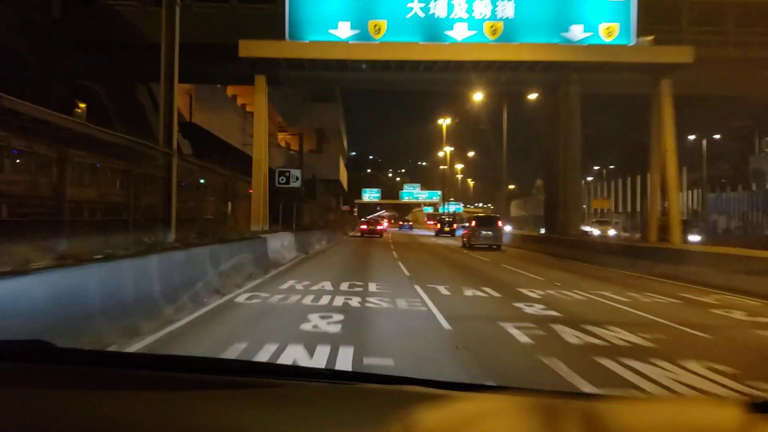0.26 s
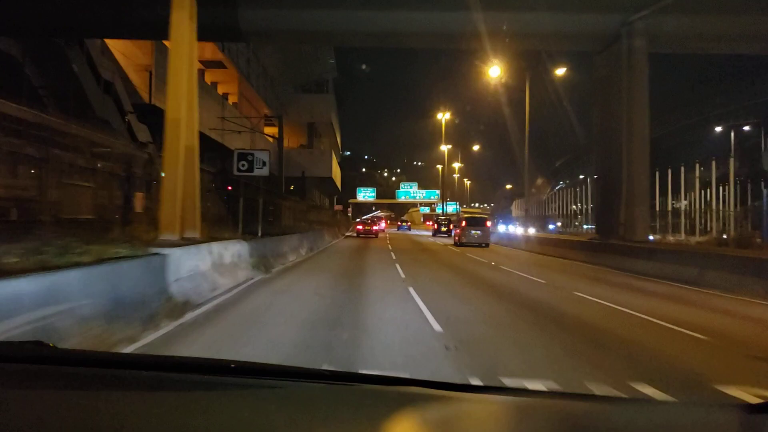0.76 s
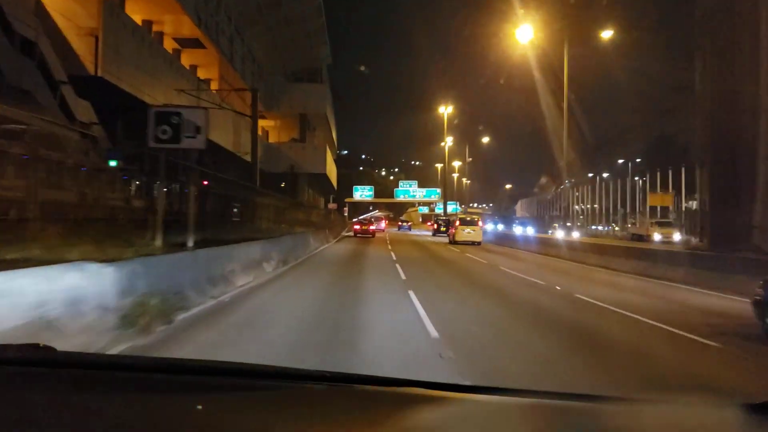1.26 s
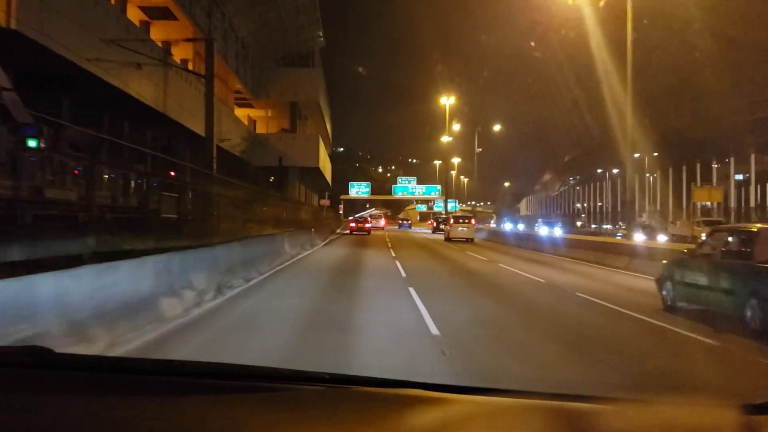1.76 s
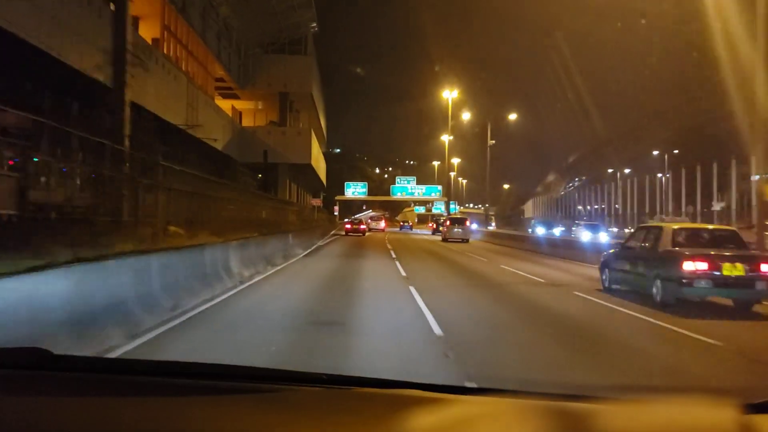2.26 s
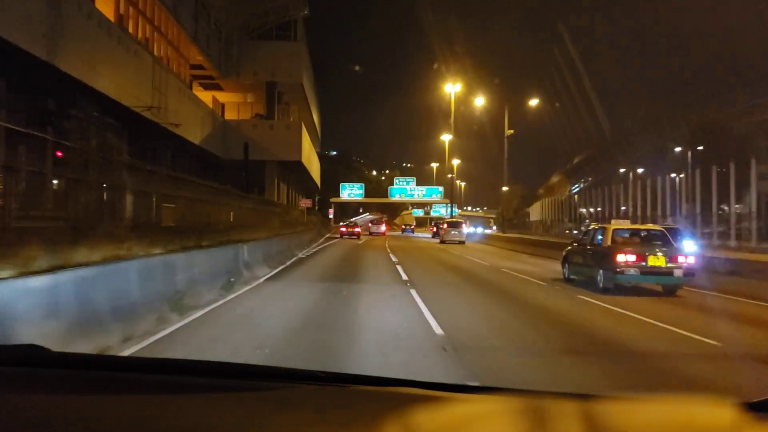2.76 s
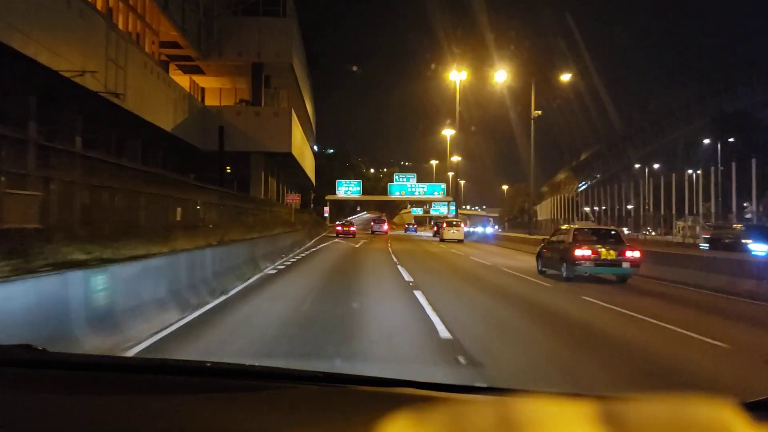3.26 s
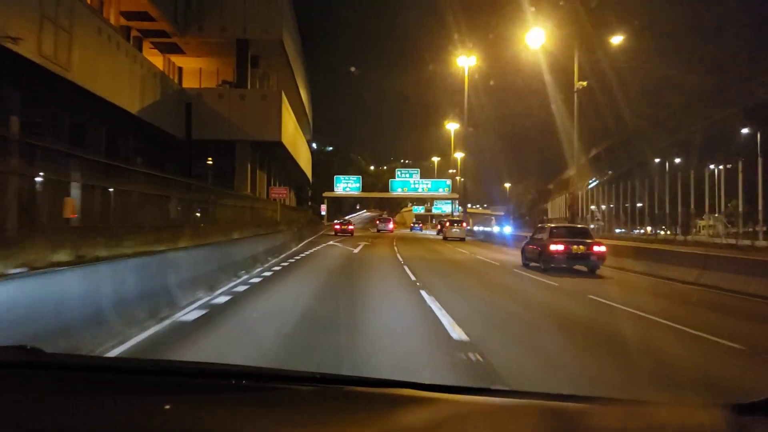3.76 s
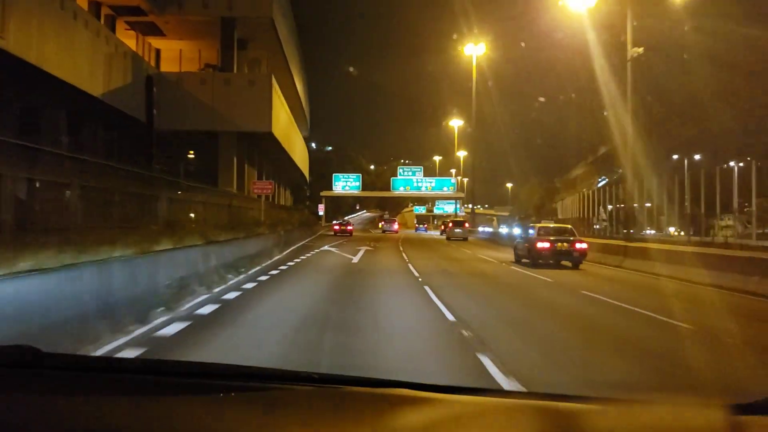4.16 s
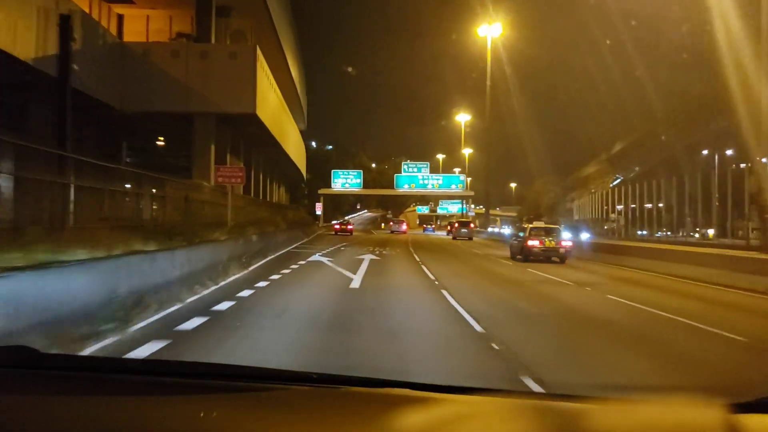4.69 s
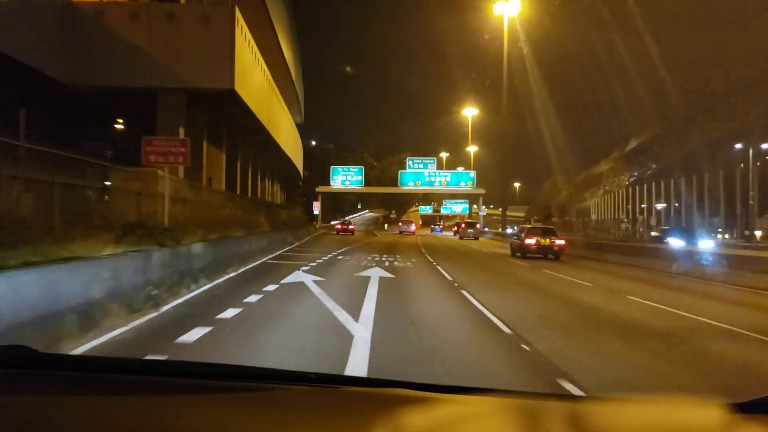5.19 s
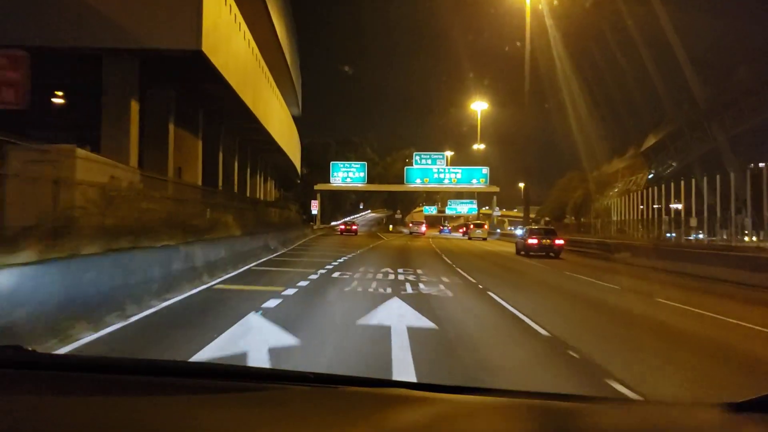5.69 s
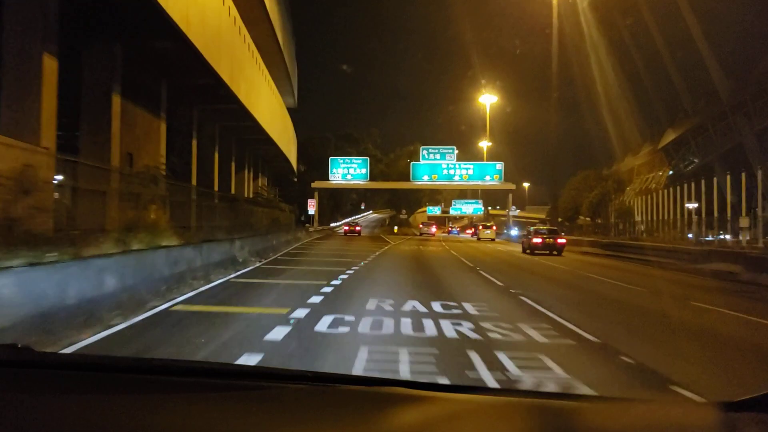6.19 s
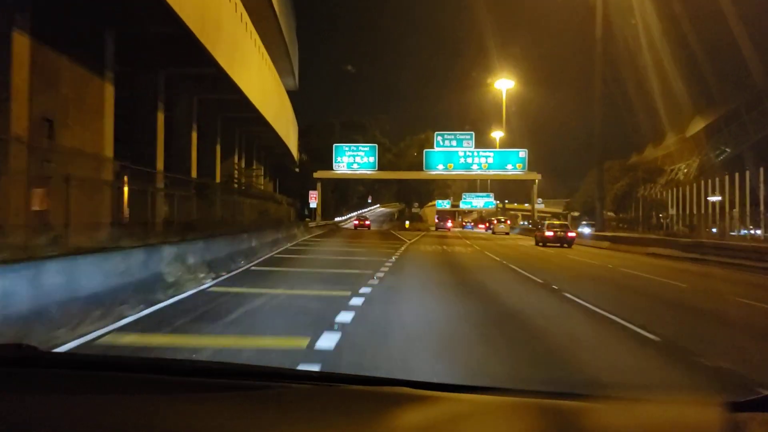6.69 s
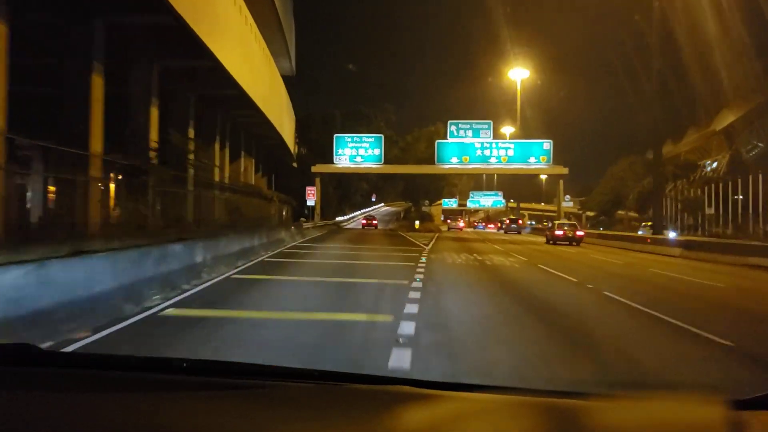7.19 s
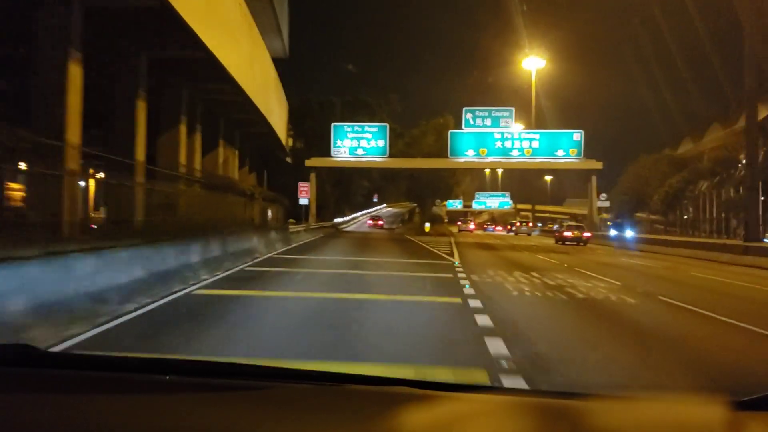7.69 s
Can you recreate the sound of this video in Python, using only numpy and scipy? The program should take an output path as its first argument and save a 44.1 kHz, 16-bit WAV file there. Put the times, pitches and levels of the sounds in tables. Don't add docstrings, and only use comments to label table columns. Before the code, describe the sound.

Inside a car on a motorway, deep road drone softens midway onto smoother asphalt, then a bumpy thud and faint trim rattles follow.

```python
import sys
import numpy as np
from scipy import signal
from scipy.fft import rfft, irfft, next_fast_len
from scipy.io import wavfile
from scipy.ndimage import uniform_filter1d

SR = 44100
rng = np.random.default_rng(int(sys.argv[2]) if len(sys.argv) > 2 else 0)


def waveform_to_disk(signal):
    frames = np.transpose(np.atleast_2d(signal))
    scaled = np.clip(frames, -1, 1) * 32767
    samples = np.round(scaled).astype(np.int16)
    wavfile.write(sys.argv[1], SR, samples)


def boost(x):
    u = np.asarray(x, float) / 20
    return 10 ** u


N = 350154
SMOOTH_FROM_S = 3.78


def line(table, hz):
    f, v = np.transpose(table)
    return np.interp(np.log(hz), np.log(f), v)


def curve(table):
    s, value = np.transpose(table)
    return np.interp(np.arange(N) / SR, s, value)


def unit(x):
    return x / np.sqrt(np.mean(x ** 2))


def band(x, hz, width):
    edges = np.clip([hz - width / 2, hz + width / 2], 20, .49 * SR)
    return signal.sosfilt(signal.butter(2, edges, "band", fs=SR, output="sos"), x)


def walk(rate):
    k = int(SR / rate)
    steps = np.repeat(rng.standard_normal(N // 100), k)[:N]
    return unit(uniform_filter1d(uniform_filter1d(steps, k), k))


def add(out, s, sound):
    i = int(s * SR)
    out[:, i:i + sound.shape[-1]] += sound[..., :N - i]


def fade(t, t60):
    return boost(-60 * t / t60)


def spectrum_hz(size):
    return np.maximum(np.arange(size // 2 + 1) * SR / size, 1)


def colour(x, left, right):
    size = next_fast_len(N + SR)
    hz = spectrum_hz(size)
    gain = boost(np.array([line(left, hz), line(right, hz)]))
    return irfft(rfft(x, size) * gain, size)[:, :N]


def road():
    # t/s, level/dB
    bumpiness = [(0.0, -21), (0.11, -29), (0.28, -32.5), (0.7, -27.5), (1.8, -27.5), (2.42, -29.5),
                 (2.6, -26), (2.9, -35), (3.4, -28.5), (4.0, -31.5), (4.25, -37), (4.9, -28.5), (5.9, -29),
                 (6.21, -34), (6.4, -23), (7.0, -34.5), (7.45, -31), (7.85, -27)]
    centres = (42, 82, 150, 420)
    # level on coarse asphalt/dB, change on smooth asphalt/dB, share of bumpiness/0-1
    regions = [
        (-35.5, -2, 0),
        (-31.5, -0.5, 0.7),
        (-33.5, -5, 0.2),
        (-39, -3, .05),
    ]
    # f/Hz, level/dB per Hz
    cabin = [(12, -40), (20, -8.5), (31, -5.5), (80, 5.5), (129, -2), (177, -12.5), (325, -14),
             (384, -19.5), (474, -22.5), (677, -29.5), (835, -32), (1140, -38.5), (1350, -45.5),
             (3000, -80.5), (3900, -100), (6600, -120)]
    # f/Hz, width/Hz, lift/dB
    body = [(39.6, 22, 15), (56.7, 15, 1), (69.6, 6, 1.5), (97, 2, 6.5), (133, 5.4, 8.5), (164, 21, 4),
            (205.7, 1.8, 11), (226, 6.6, 3), (314, 76, -1.5), (379, 33, -5), (872, 150, 2.5)]
    # f/Hz, likeness/-1 to 1
    likeness = [(60, 0.93), (170, 0.94), (340, 0.69), (520, .35), (800, 0.18), (1050, -0.42), (1400, -.42),
                (1800, 0.29), (3000, -1.5)]
    # f/Hz, left minus right/dB
    leaning = [(60, 5), (110, -0.5), (200, 5), (380, 3), (700, 2.5), (1290, 2.5), (2380, 8.5), (4400, 10.5),
               (8120, 9), (15000, 2.5)]

    size = next_fast_len(N)
    hz = spectrum_hz(size)
    db = line(cabin, hz) + sum(lift / (1 + (2 * (hz - f) / w) ** 2) for f, w, lift in body)
    like = np.clip(line(likeness, hz), -.99, .99)
    lean = line(leaning, hz) / 2
    mid, side = rfft(rng.standard_normal((2, size))) * boost(db)
    mid, side = mid * np.sqrt(1 + like), side * np.sqrt(1 - like)
    ears = np.array([(mid + side) * boost(lean), (mid - side) * boost(-lean)])

    since_smooth = np.arange(N) / SR - SMOOTH_FROM_S
    smooth = .5 + .5 * np.tanh(since_smooth / 0.14)
    slowing_db = -0.19 * since_smooth
    uneven_db = curve(bumpiness) + 30
    out = 0
    for region, (coarse_db, drop_db, share) in zip(np.eye(4), regions):
        level_db = coarse_db + drop_db * smooth + share * uneven_db + slowing_db
        part = irfft(ears * line(list(zip(centres, region)), hz), size)[:, :N]
        out = out + part / np.std(part.mean(axis=0)) * boost(level_db + 0.71 * walk(11))
    return out


def barrier():
    smooth = 1. * (np.arange(N) / SR > SMOOTH_FROM_S)
    db = -88 - 4 * uniform_filter1d(smooth, SR // 5) + 3.1 * walk(3)
    tyre_hiss = unit(band(rng.standard_normal((2, N)), 2900, 960))
    return tyre_hiss * boost(db + np.array([[3.0], [-3.0]]))


def hiss():
    # f/Hz, level/dB per Hz
    hiss_left = [(1800, -114), (2150, -112), (2620, -101), (2760, -113), (4600, -121), (6200, -113),
                 (6900, -114), (7300, -128), (9500, -129), (11000, -121), (12800, -118), (13300, -114),
                 (15700, -112), (15950, -150)]
    hiss_right = [(1800, -116), (3000, -118), (4600, -124), (7000, -128), (9500, -129), (11000, -123),
                  (15700, -124), (15950, -150)]
    return colour(rng.standard_normal((2, N)), hiss_left, hiss_right) * np.sqrt(SR / 2)


def rustle():
    # t/s, level/dB
    shake = [(0.0, -4), (.13, -5), (0.5, -6), (1.55, -18.5), (1.85, -29.5), (2.15, -14.5), (3.6, -33),
             (3.85, -15), (4.5, -27), (5.7, -20), (6.02, -0.5), (6.23, -5), (6.48, -3), (6.7, -14),
             (7.3, -10.5), (7.6, -1.5), (7.83, 6.5), (7.94, 0)]
    # f/Hz, width/Hz, level/dB, share of the shake/0-1
    panels = [
        (2160, 1300, -68.5, 0.38),
        (6000, 10000, -70, .95),
    ]
    shake_db = curve(shake)
    out = np.zeros((2, N))
    for hz, width, db, share in panels:
        rub = unit(band(rng.standard_normal((2, N)), hz, width))
        out += rub * boost(db + share * shake_db + 1.5 * walk(60))
    return out


def joints():
    # t/s, peak/dB, ring f/Hz, time to fade by 60 dB/s
    thumps = [(.045, -18, 48.3, 0.65), (0.339, -23, 135, 0.62), (0.489, -20, 46.2, 0.37),
              (.9, -20, 97, 0.8), (1.763, -22.5, 133, 0.39), (2.36, -19.5, 133, 1),
              (2.504, -14, 73.8, 0.38), (2.746, -15.5, 67, 0.084), (5.032, -27.5, 41.7, 0.94),
              (5.9, -30.5, 42, 0.53), (7.621, -22, 45.4, 0.83), (7.8, -29.5, 118.8, 0.76),
              (6.307, -30.5, 438, 0.077), (6.314, -25, 270, 0.054), (6.331, -13, 124.3, 0.18),
              (6.348, -14.5, 108.4, .45), (6.406, -13.5, 95.8, 0.13), (6.425, -17, 103.5, 0.14),
              (6.499, -12.5, 104.5, 0.32), (6.551, -26, 120.1, 0.94), (6.628, -21, 48.5, 0.39),
              (6.75, -18, 47.4, 0.33)]
    out, t = np.zeros((2, N)), np.arange(SR) / SR
    for s, db, hz, t60 in thumps:
        ring = np.sin(2 * np.pi * hz * t) * fade(t, t60) * (1 - np.exp(-t / 0.0012))
        add(out, s, boost(db + np.array([[1.0], [-1.0]])) * ring)
    return out


def ticks():
    # t/s, peak/dB, bright share/dB, dull share/dB
    dashboard = [(0.0493, -61, -8, -10), (0.1134, -58, -3.5, -1), (0.1234, -51, -5.5, 5),
                 (0.155, -66, -19, 13), (0.201, -60, -8, -6), (0.2118, -55, -6.5, -4),
                 (0.389, -67, -7, -0.5), (0.4573, -62.5, -8, -6), (3.9888, -62.5, -3, -8),
                 (4.3231, -64, -7, -10), (4.4682, -65, -11, -6), (4.5347, -62.5, -9, -12),
                 (5.7496, -59, -14, -8), (5.829, -60.5, -7, -13), (5.9238, -57.5, -4, -10),
                 (6.0082, -58, -2, 4), (6.0553, -59, -15, 7), (6.093, -57, -6, 5.5), (6.1263, -55, -9, 3),
                 (6.186, -59.5, -9, -19), (6.2658, -62, -3, -14), (6.3483, -60, -7.5, -7),
                 (6.4058, -57.5, -8, 2), (6.546, -59.5, -5.5, -12), (6.618, -61.5, 3, -20),
                 (7.232, -59, -20, -19), (7.4019, -62.5, -6, -9), (7.6765, -56, -7, 1),
                 (7.7578, -52.5, -5, 1), (7.851, -59, -6, 5)]
    # t/s, peak/dB, left minus right/dB
    holder = [(0.287, -63, -1), (0.7183, -71, 15), (0.8081, -76, 12), (0.9388, -69.5, 9), (1.519, -67, 5),
              (2.2235, -76, 11.5), (2.7275, -73.5, 26), (2.993, -68, 4), (3.045, -69, 2), (3.629, -70, 5),
              (3.7319, -71, 3.5), (3.771, -71, 19), (3.8871, -66.5, 5), (4.1063, -67, 8), (4.6099, -68, 2),
              (4.671, -67.5, 4.5), (5.152, -68.5, 7), (5.2275, -73, 12.5), (5.3239, -65.5, 10),
              (5.444, -68, 5), (7.0835, -70, 4), (7.3068, -76, 16), (7.3721, -71, 17), (7.669, -66, 14)]
    snaps = [(s, db, bright_db, dull_db, 4) for s, db, bright_db, dull_db in dashboard]
    snaps += [(s, db, -8, -4.5, pan_db) for s, db, pan_db in holder]

    out, t = np.zeros((2, N)), np.arange(SR // 8) / SR
    shape = fade(t, .035) + boost(-10) * fade(t, .22)
    bands = [(6260, 5100), (2700, 2600), (14800, 6000)]
    plastic = [unit(band(rng.standard_normal((2, N)), hz, width)) for hz, width in bands]
    starts = rng.integers(0, N - len(t), len(snaps))
    for (s, db, bright_db, dull_db, pan_db), i in zip(snaps, starts):
        middle, dull, bright = [part[:, i:i + len(t)] for part in plastic]
        sides = boost(np.array([[pan_db - 12.5], [10 - pan_db]]) / 2)
        body = middle + boost(dull_db - 5.5) * dull
        add(out, s, boost(db) * shape * (sides * body + boost(bright_db + 10) * bright))
    return out


def trim():
    # f/Hz, level/dB
    port_left = [(1500, 8.5), (2100, -0.5), (2600, 0.5), (2800, -4.5), (4300, -2.5), (6400, 5.5), (7000, 2),
                 (7500, -16), (8700, -25), (9800, -9.5), (11000, -2.5), (13400, -14.5), (15300, -1.5),
                 (15900, -29)]
    port_right = [(1500, 2), (2200, -16.5), (3500, -5.5), (4500, -14), (8000, -11), (9100, -14), (11400, 1),
                  (13500, -11), (15600, -2), (16700, -28.5)]
    return colour(rustle() + ticks(), port_left, port_right)


def knocks():
    # t/s, peak/dB, ring f/Hz
    hits = [(0.135, -60, 2900), (.123, -68, 2110), (5.323, -49, 1510), (5.715, -60, 1530),
            (5.84, -65, 2280), (5.901, -61, 1900), (6.131, -54, 1480), (6.177, -58, 1560),
            (6.322, -40, 382), (6.371, -53, 1725), (6.423, -59, 2300), (7.231, -62, 5920),
            (7.934, -50, 2630)]
    out, t = np.zeros((2, N)), np.arange(SR // 8) / SR
    shape = fade(t, 0.044) + boost(-14.5) * fade(t, 0.38)
    shape = shape * (1 - np.exp(-t / .003))
    for s, db, hz in hits:
        ring = np.sin(2 * np.pi * hz * t) * fade(t, .06)
        noise = unit(band(rng.standard_normal((2, len(t))), 1.25 * hz, .8 * hz))
        add(out, s, boost(db + np.array([[3.0], [-4.0]])) * (ring + 0.6 * noise) * shape)
    return out


def seal():
    # f/Hz, width/Hz
    modes = [
        (12250, 1150),
        (13500, 2000),
        (15450, 800),
    ]
    # t/s, length/s, level/dB
    squeaks = [
        [(5.994, .47, -67), (6.58, .07, -66.5), (6.72, 0.46, -68.5), (7.257, .37, -68), (7.707, 0.076, -66)],
        [(2.32, .1, -76.5), (2.736, 0.37, -74.5), (3.24, .2, -78), (5.043, 0.21, -76), (5.293, 0.38, -74),
         (6.0, .45, -73), (6.7, .9, -83)],
        [(.2, .55, -75), (.92, .08, -83), (1.1, 0.11, -76), (1.248, .2, -77.5), (1.5, 0.3, -77),
         (1.904, .27, -74), (2.5, .15, -74), (3.44, .22, -76), (3.75, 0.12, -75.5), (3.95, .08, -82),
         (4.1, .12, -76), (4.3, .4, -75.5), (4.8, .27, -75), (5.703, 0.92, -78), (6.55, .3, -77.5),
         (6.9, .08, -87), (7.154, .1, -75), (7.35, 0.79, -73)],
    ]
    out = np.zeros((2, N))
    for (hz, width), spells in zip(modes, squeaks):
        load = np.zeros(N)
        for s, length, db in spells:
            load[int(s * SR):int((s + length) * SR)] += boost(db)
        load = uniform_filter1d(load, SR // 16)
        slip = .5 + .5 * np.tanh(4.0 * (walk(130) + .5))
        rub = band(band(rng.standard_normal(N), hz, width), hz, 1.3 * width)
        out[0] += unit(rub * (boost(-6.5) + slip)) * load * boost(1.2 * walk(13))
    return out


def scene():
    return road() + barrier() + hiss() + joints() + trim() + knocks() + seal()


def top_cut(x):
    return signal.sosfilt(signal.butter(12, 16510, fs=SR, output="sos"), x)


def record(dry):
    opening = 1 - np.exp(-np.arange(N) / SR / .00015)
    click = boost(-36) * (np.arange(N) == 1)
    treble_cut = signal.ellip(7, .3, 30, 15850, fs=SR, output="sos")
    mix = signal.sosfilt(treble_cut, dry * opening + click)
    return top_cut(mix)


dry = scene()
out = record(dry)
waveform_to_disk(out)
```